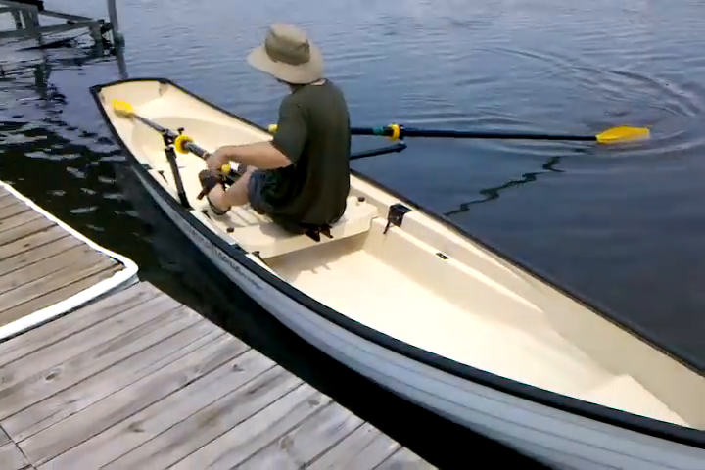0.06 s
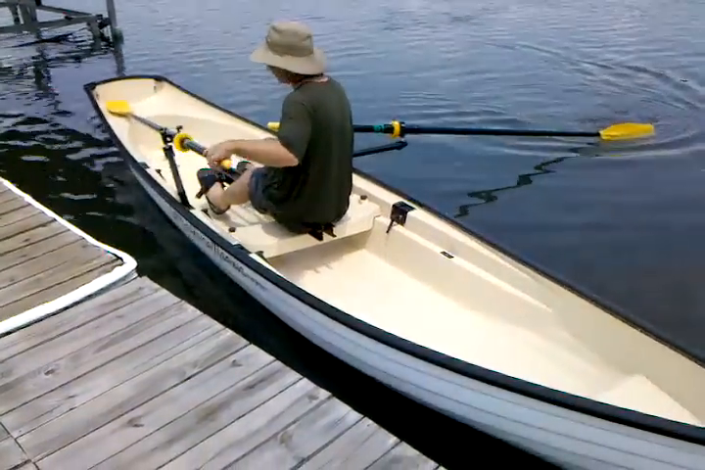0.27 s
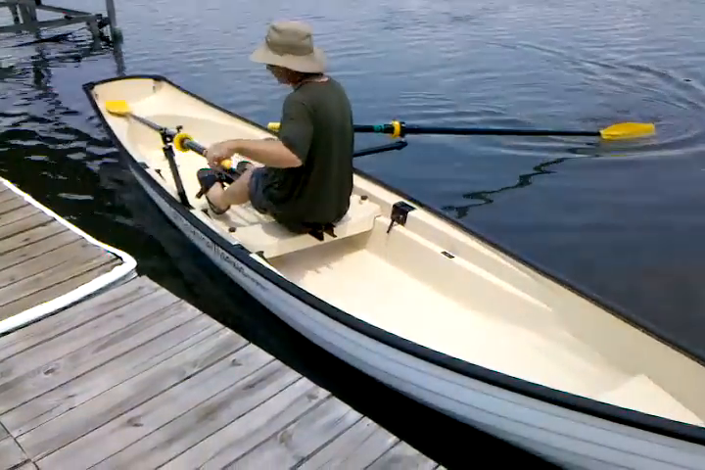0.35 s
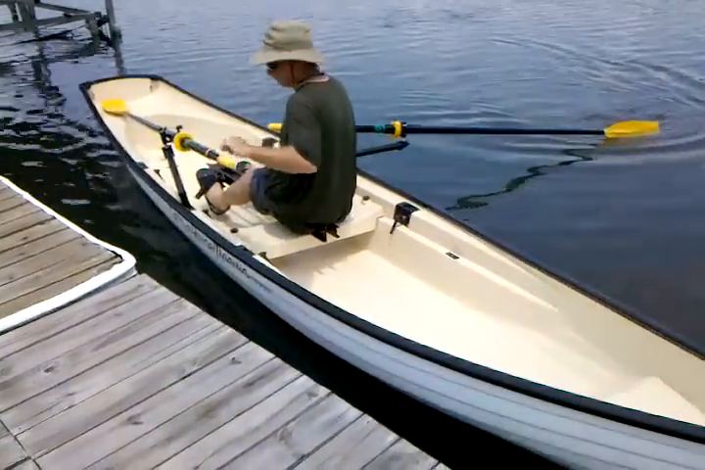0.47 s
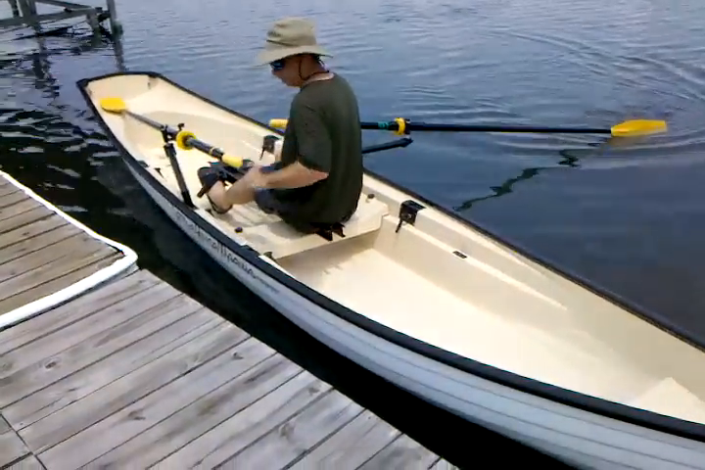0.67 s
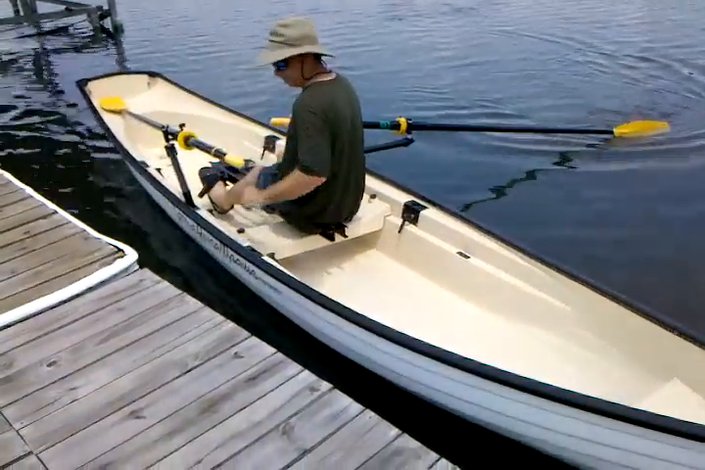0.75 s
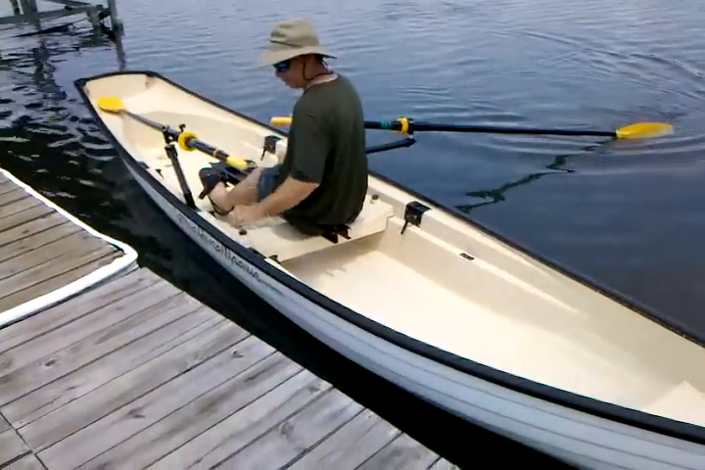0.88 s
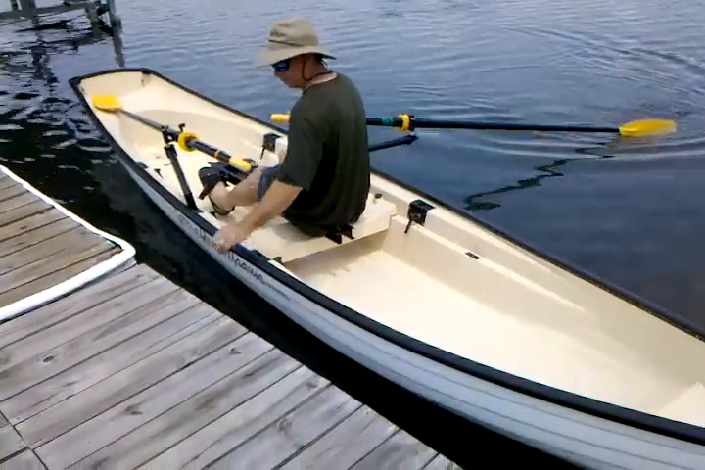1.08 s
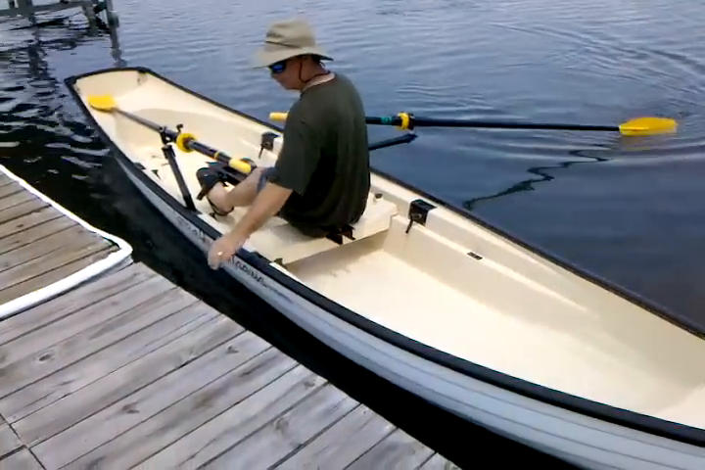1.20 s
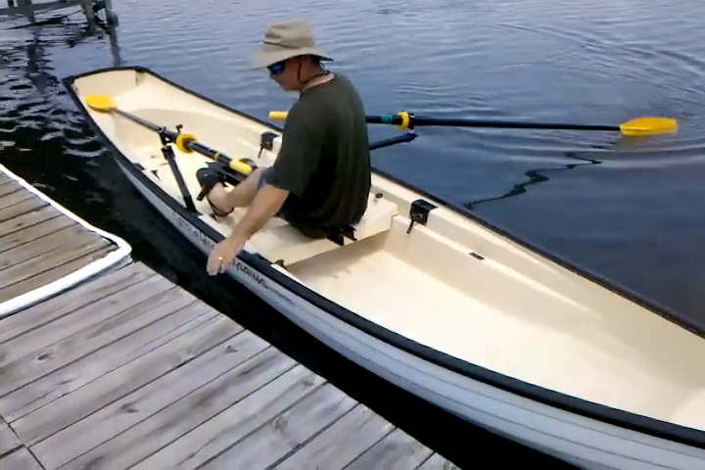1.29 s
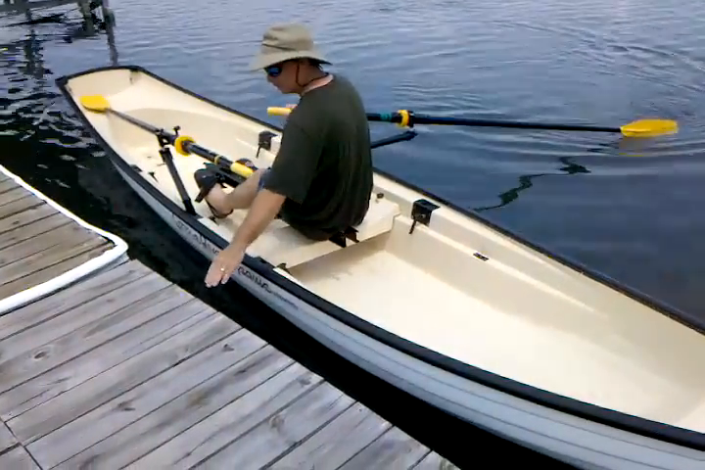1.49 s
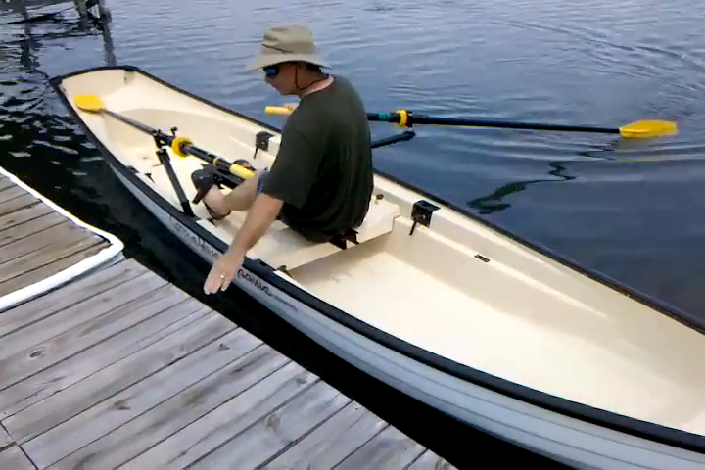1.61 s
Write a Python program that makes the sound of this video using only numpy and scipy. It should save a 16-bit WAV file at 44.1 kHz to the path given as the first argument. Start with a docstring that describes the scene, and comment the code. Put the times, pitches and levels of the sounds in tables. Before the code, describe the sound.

One sharp, hollow knock of an oar on a boat, with faint birds far away.

```python
"""A rowing boat's hull rumbles softly beside a dock as the rower shifts his weight. A quarter second in,
an oar is laid down: the shaft grazes the hull, cracks against it and rebounds twice. Each impact excites
the damped modes of the shaft and of the hollow, booming shell, and the dock echoes faintly. Light scuffs
and a last bump follow while a far bird whistles twice. Throughout, another bird chips evenly over a low
outdoor rumble and a thin hiss."""
import sys
import numpy as np
from scipy import signal
from scipy.fft import rfft, irfft, next_fast_len
from scipy.io import wavfile
from scipy.ndimage import map_coordinates

SR = 44100
rng = np.random.default_rng(int(sys.argv[2]) if len(sys.argv) > 2 else 0)


def int16_out(signal):
    """Quantize to a 16-bit WAV file."""
    q = np.round(np.clip(np.atleast_2d(signal).T, -1, 1) * 32767)
    wavfile.write(sys.argv[1], SR, q.astype(np.int16))


N = 72765
T = np.arange(N) / SR


def amp(db):
    """Amplitude ratio of a level in decibels."""
    return 10 ** (np.asarray(db) / 20)


def unit(x):
    """Normalisation to rms 1."""
    return x / np.sqrt(np.mean(x ** 2) + 1e-20)


def coloured(x, points):
    """Linear filtering: the spectrum of x times a (Hz, dB) response."""
    size = next_fast_len(N + 8192)
    hz, db = np.transpose(points)
    gain = amp(np.interp(np.log(np.fft.rfftfreq(size, 1 / SR) + 1), np.log(hz), db))
    return irfft(rfft(x, size) * gain, size)[:N]


def noise(points):
    """Filtered Gaussian noise of rms 1 with a (Hz, dB) spectral shape."""
    return unit(coloured(rng.standard_normal(N), points))


def wobble(rate):
    """Smooth random modulation, rate knots a second."""
    return map_coordinates(rng.standard_normal(N), [T * rate], mode="wrap")


def fade(start, attack, t60):
    """Exponential damping after a blow: a quick rise, then 60 dB of decay in t60 seconds."""
    t = np.maximum(T - start, 0)
    return (1 - np.exp(-t / attack)) * np.exp(-np.log(1000) * t / t60)


def ring(start, modes, attack):
    """Modal superposition: a struck body vibrates as a sum of damped sinusoids."""
    return sum(amp(db) * fade(start, attack, t60) * np.sin(2 * np.pi * hz * (T - start))
               for hz, db, t60 in modes)


# Impact and rebounds. Each row: start in seconds, then boom, clack and crack gains in dB.
OAR_CONTACTS = [(0.2460, -28, -22.5, -23.5), (0.2716, -39.5, -39, -44), (0.2893, -40, -35, -37)]
# Modes of the hull and of the shaft with its fittings.
# Each row: frequency in Hz, relative level in dB, 60 dB decay time in seconds.
HULL_MODES = [(116.8, -17.5, 0.46), (143.7, -3.5, 0.24), (183.8, -4.5, 0.2), (227.6, -2, .23),
              (257, 11.5, 0.062), (295.5, -6, .2), (313.7, -9.5, 0.29), (389.6, -12.5, .18),
              (640.6, -7, 0.18), (763, -16, 0.25), (829.5, -11, 0.14), (894, -14.5, 0.086),
              (956, -9.5, 0.14), (1135, -17.5, .13)]
SHAFT_MODES = [(1279, -17.5, 0.15), (1492, -7.5, 0.058), (1783, 1.5, 0.018), (2136, -9, 0.046),
               (2452, -14.5, 0.057), (3175, -22.5, 0.05), (3360, -21, .04), (5110, -23, 0.045),
               (6400, -24.5, 0.022)]
# Spectra of the graze, the crack and the shell's dense ring.
# Each row: frequency in Hz, relative level in dB.
GRAZE_SPECTRUM = [(500, -18), (1300, -5.5), (1900, 0), (2500, -12), (3300, -26), (6000, -31.5)]
CRACK_SPECTRUM = [(300, -4.5), (700, -12), (1200, -1), (1800, 5), (2700, 0), (3600, -8.5), (4400, -20.5),
                  (5300, -6), (6500, -10.5), (7300, -40), (8200, -47.5)]
SHELL_SPECTRUM = [(60, -2.5), (105, 5), (160, 2), (300, 1), (550, -0.5), (1050, -9), (1350, -7),
                  (2200, -12), (3300, -28), (4300, -30.5), (6300, -39)]
# Radiation efficiency of the shell. Each row: frequency in Hz, gain in dB.
SHELL_RADIATION = [(30, -2), (65, -21.5), (105, -1.5), (390, 0.5), (440, -4), (540, -6), (630, 0.5)]
HULL_LAG_S, HULL_ATTACK_S, SHAFT_ATTACK_S = 0.001982, 0.0021, 0.00026


def oar():
    """Impact excitation: each contact rings the shaft, then the hull; the dock reflects a faint echo."""
    graze = fade(start=0.242, attack=HULL_ATTACK_S, t60=0.026)
    shaft = amp(-34) * noise(GRAZE_SPECTRUM) * graze
    hull = np.zeros(N)
    for start, boom_db, clack_db, crack_db in OAR_CONTACTS:
        late = start + HULL_LAG_S
        shell_decay = amp(-7) * fade(late, HULL_ATTACK_S, t60=0.15)
        dock_echo = amp(-25) * fade(late, attack=0.02, t60=0.67)
        dense_ring = noise(SHELL_SPECTRUM) * (shell_decay + dock_echo)
        hull += amp(boom_db) * (ring(late, HULL_MODES, HULL_ATTACK_S) + dense_ring)
        shaft += amp(clack_db) * ring(start, SHAFT_MODES, SHAFT_ATTACK_S)
        shaft += amp(crack_db) * noise(CRACK_SPECTRUM) * fade(start, SHAFT_ATTACK_S, t60=0.019)
    return shaft + coloured(hull, SHELL_RADIATION)


# Soft bumps of the hull. Each row: start in seconds, gain in dB.
HULL_BUMPS = [(-0.01, -52), (0.029, -52), (0.433, -60)]
# Scuffs of the oarlocks. Each row: centre in seconds, level in dB, Gaussian width in seconds.
OARLOCK_SCUFFS = [(0.058, -62, .01), (0.382, -62, 0.0057), (0.426, -66, 0.0081), (1.385, -73.5, 0.0044)]
# Spectra of a bump and a scuff. Each row: frequency in Hz, relative level in dB.
BUMP_SPECTRUM = [(40, -19.5), (110, -5.5), (160, 2.5), (230, -6.5), (300, -10.5), (600, -22), (1300, -35.5),
                 (3000, -57)]
SCUFF_SPECTRUM = [(200, -20), (580, 11), (850, -12), (1300, -1.5), (2400, -16), (5000, -49.5)]
BUMP_ATTACK_S = 0.0033


def rower_shifting():
    """Soft impact and friction: slow blows excite the hull's lowest modes, and the oarlocks scuff."""
    bumps = np.zeros(N)
    for start, db in HULL_BUMPS:
        thud = fade(start, BUMP_ATTACK_S, t60=0.48) * noise(BUMP_SPECTRUM)
        low_modes = amp(1) * ring(start, HULL_MODES[:4], BUMP_ATTACK_S)
        bumps += amp(db) * (thud + low_modes)
    rubbing = sum(amp(db) * np.exp(-0.5 * ((T - centre) / width) ** 2)
                  for centre, db, width in OARLOCK_SCUFFS)
    return bumps + noise(SCUFF_SPECTRUM) * rubbing


# A far bird's chips. Each row: start in seconds, gain in dB.
BIRD_CHIPS = [(0.121, -61), (0.849, -62.5), (1.5, -63)]
# Spectrum of their rasp. Each row: frequency in Hz, relative level in dB.
RASP_SPECTRUM = [(2600, -31), (3150, 1.5), (3600, -3), (4200, -4), (4800, -46)]
CHIP_HZ, CHIP_FALL_HZ_PER_S, CHIP_S = 3370, 19000, 0.016


def chipping_bird():
    """Linear frequency sweep: each chip is a tiny falling tone with a rasp of noise."""
    chips = np.zeros(N)
    for start, db in BIRD_CHIPS:
        t = np.clip(T - start, 0, CHIP_S)
        note = np.sin(2 * np.pi * (CHIP_HZ - 0.5 * CHIP_FALL_HZ_PER_S * t) * t)
        envelope = np.sin(np.pi * (t / CHIP_S) ** 0.4)
        chips += amp(db) * envelope * (note + amp(-4) * noise(RASP_SPECTRUM))
    return chips


# Two slurred whistles, one list apiece. Each row: time in seconds, pitch in Hz, level in dB.
WHISTLE_CONTOURS = [
    [(0.34, 2050, -80), (0.39, 2200, -74), (0.425, 2330, -73), (0.452, 2300, -92), (0.476, 2280, -92),
     (0.486, 2080, -72), (0.5, 1850, -88)],
    [(0.725, 1780, -85), (0.738, 1770, -74), (0.757, 1760, -74), (0.775, 1600, -84), (0.802, 1820, -74),
     (0.815, 2200, -77), (0.835, 2560, -77), (0.865, 2600, -76), (0.895, 2330, -81)],
]
BLUR_KNOTS_PER_S = 241.6


def whistling_bird():
    """Spectral broadening: random amplitude and phase blur a gliding tone, as distance does."""
    whistles = np.zeros(N)
    for contour in WHISTLE_CONTOURS:
        times, hz, db = np.transpose(contour)
        blur = wobble(BLUR_KNOTS_PER_S) + 1j * wobble(BLUR_KNOTS_PER_S)
        phase = 2 * np.pi * np.cumsum(np.interp(T, times, hz)) / SR
        tone = unit(np.real(blur * np.exp(1j * phase)))
        whistles += tone * np.interp(T, times, amp(db), left=0, right=0)
    return whistles


# Spectra of the outdoor background. Each row: frequency in Hz, relative level in dB.
RUMBLE_SPECTRUM = [(25, -32), (50, -12), (80, -10), (120, 0.5), (200, -3.5), (320, -11), (600, -15),
                   (1200, -20.5), (2500, -24.5), (5000, -41.5)]
HISS_SPECTRUM = [(1000, -7), (2500, -8), (3800, -6), (4500, -2), (5200, 0.5), (6000, -7.5), (6900, -7.5),
                 (7400, -36)]


def outdoors():
    """Stationary noise: a low rumble under a thin hiss."""
    return amp(-67.5) * noise(RUMBLE_SPECTRUM) + amp(-73.5) * noise(HISS_SPECTRUM)


def scene():
    """Superposition: boat, birds and air add in one channel."""
    return (oar() + rower_shifting() + chipping_bird() + whistling_bird() + outdoors())[None]


BASS_CUT_HZ, TOP_HZ, EDGE_WIDTH_HZ = 75, 7698, 900


def record(dry):
    """Band limiting: a high-pass thins the deep bass and a raised-cosine edge removes the top treble."""
    highpass = signal.butter(N=3, Wn=BASS_CUT_HZ / (SR / 2), btype="high", output="sos")
    thinned = signal.sosfilt(highpass, dry)
    edge = np.clip(0.5 + (TOP_HZ - np.fft.rfftfreq(2 * N, 1 / SR)) / EDGE_WIDTH_HZ, 0, 1)
    return irfft(rfft(thinned, 2 * N) * np.sin(np.pi / 2 * edge) ** 2)[:, :N]


dry = scene()
out = record(dry)
int16_out(out)
```